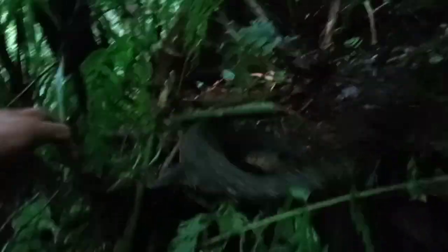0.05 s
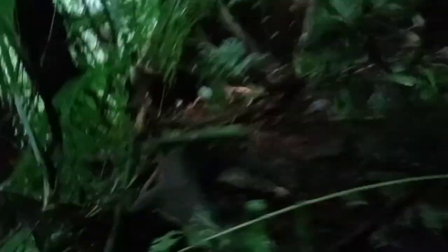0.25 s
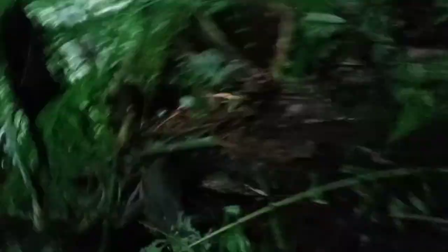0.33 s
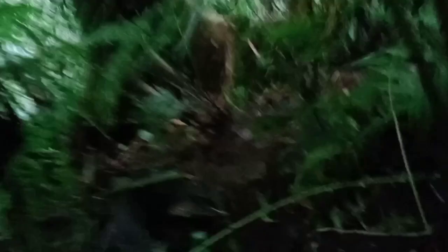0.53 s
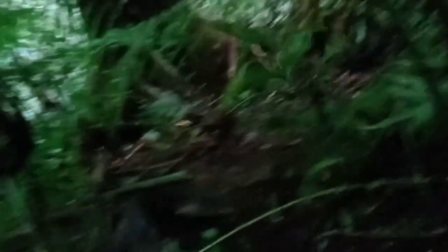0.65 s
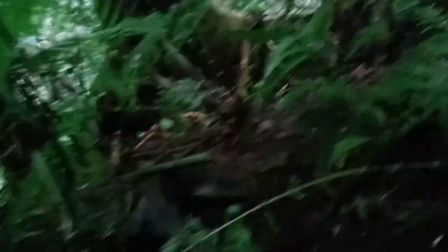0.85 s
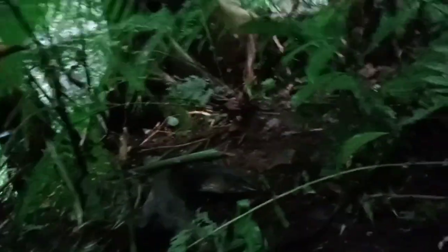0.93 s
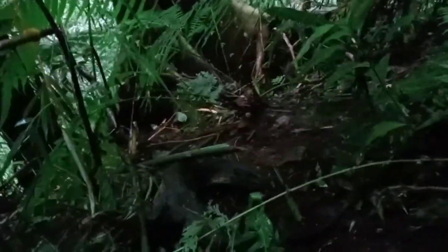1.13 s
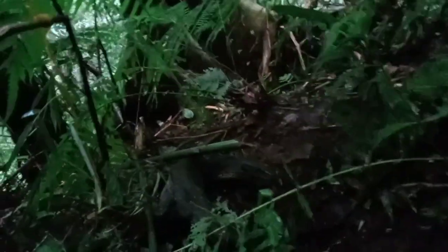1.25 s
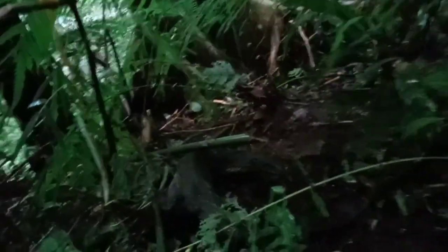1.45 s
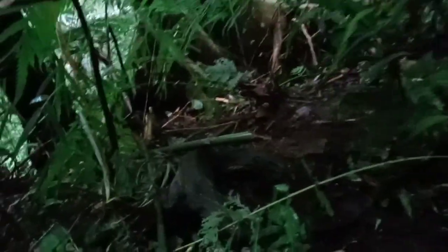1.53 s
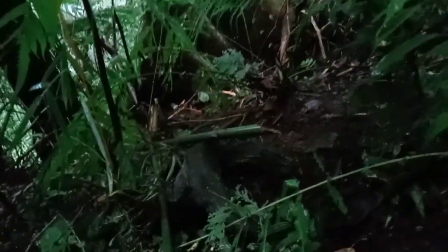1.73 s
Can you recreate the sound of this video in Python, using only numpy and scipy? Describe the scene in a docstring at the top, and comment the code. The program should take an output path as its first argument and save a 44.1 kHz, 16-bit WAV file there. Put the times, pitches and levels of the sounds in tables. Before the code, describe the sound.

One close chop in a damp forest: leaves brush, a blade cracks through a stalk, and torn foliage rustles and settles. A quiet, steady sound like flowing water continues underneath, with a few faint, far-off bird whistles afterwards.

```python
"""A blade chops once through a green stalk in a damp forest, close by.
A steady wash like running water is there from the start. Leaves brush and twigs snap during the swing.
At 0.2 s the blade swishes in and crushes the stalk, which cracks and rings with a dull thud.
Its fibres tear and the foliage rustles to rest. From 0.8 s a few faint, distant bird whistles follow,
with one soft bump near 1.5 s."""
import sys
import numpy as np
from scipy import signal
from scipy.io import wavfile
from scipy.ndimage import uniform_filter1d

SR = 44100
rng = np.random.default_rng(int(sys.argv[2]) if len(sys.argv) > 2 else 0)


def generate_wav(signal):
    """Clip the signal to [-1, 1] and save it as 16-bit WAV at the path in sys.argv[1]."""
    frames = np.transpose(np.atleast_2d(signal))
    scaled = np.clip(frames, -1, 1) * 32767
    pcm = np.round(scaled).astype(np.int16)
    wavfile.write(sys.argv[1], SR, pcm)


N = 79380
T = np.arange(N) / SR

# Tone of the stalk being crushed under the blade: frequency_hz, relative_db
STALK_SPECTRUM = [(30, -46), (75, -10), (160, -1), (400, -4.5), (700, -8), (860, -7), (1200, -14),
                  (1600, -12), (2200, -3.5), (3200, -4), (4050, -23), (4600, -10), (7900, -11),
                  (10300, -22.5), (15300, -22)]
# Tone of leaves rubbing together: frequency_hz, relative_db
LEAF_SPECTRUM = [(40, -24), (90, -5.5), (260, -6), (500, -10), (1050, -8.5), (1800, -13.5), (2500, -3.5),
                 (3300, -3.5), (4100, -12), (5500, -11.5), (7200, -6), (8500, -15.5), (10200, -20),
                 (12500, -16.5), (15200, -11)]


def amp(db):
    """Turns decibels into a number to multiply by."""
    return 10 ** (np.asarray(db) / 20)


def evened(x):
    """Scales a signal to an average (rms) level of 1."""
    return x / np.sqrt(np.mean(x ** 2) + 1e-20)


def level_at(spectrum, hz):
    """Reads a spectrum between its points, on a logarithmic frequency scale."""
    points_hz, points_db = np.transpose(spectrum)
    return np.interp(np.log(hz + 1), np.log(points_hz + 1), points_db)


def add(mix, start_s, sound):
    """Adds a sound to the mix at the given time."""
    part = mix[max(round(start_s * SR), 0):][:len(sound)]
    part += sound[:len(part)]


def colour(x, spectrum, size=4096):
    """Gives a sound the tone of a spectrum; white noise keeps its power."""
    log_gain = np.log(amp(level_at(spectrum, abs(np.fft.fftfreq(size, 1 / SR)))))
    response = np.exp(np.conj(signal.hilbert(log_gain)))  # rings after a click, never before
    taps = np.fft.ifft(response).real[:size // 2]
    return signal.fftconvolve(x, taps / np.linalg.norm(taps))[:len(x)]


def drift(count, smooth_over):
    """A smooth random wobble."""
    return evened(uniform_filter1d(rng.standard_normal(count), size=smooth_over))


def grains(per_s, spread_db):
    """A dense stream of tiny clicks of uneven size."""
    size = amp(spread_db * np.minimum(rng.exponential(1, N), 3))
    return evened(size * rng.choice([-1, 1], N) * (rng.random(N) < per_s / SR))


def forest_echo(x, fade_s):
    """Trunks and foliage scatter a sound into echoes that fall 60 dB in fade_s."""
    tail = rng.standard_normal(N) * amp(-60 * T / fade_s)
    return signal.fftconvolve(x, tail / np.linalg.norm(tail))[:N]


def water():
    """A far wash like running water: noise with drifting patches of tone and a slight swell."""
    # Tone of the wash: frequency_hz, relative_db
    wash_spectrum = [(20, -42), (35, -20), (51, -11), (75, -2.5), (140, -4), (230, -4), (300, -9.5),
                     (410, -5.5), (622, -8), (1230, -4.5), (2300, -2.5), (2900, -2.5), (3400, -4.5),
                     (4100, -14), (4550, -13), (4900, -9.5), (5500, -16.5), (6400, -22), (7800, -19),
                     (9900, -36.5), (12500, -40), (15500, -36.5)]
    # How its treble changes: time_s, boost_db
    treble_curve = [(0, 3), (0.5, 2), (1.05, 0.5), (1.45, 0.5), (1.8, -1.5)]
    frames, hz = N // 256 + 5, np.fft.rfftfreq(1024, 1 / SR)
    real, imaginary, patches = rng.standard_normal((frames, len(hz), 3)).T
    patches = uniform_filter1d(patches, size=7, axis=0)  # smooth across frequency
    patches_db = 1.77 * evened(uniform_filter1d(patches, size=4, axis=1))  # then across time
    swell_db = 0.2 * drift(frames, smooth_over=14)
    treble_db = np.interp(np.linspace(0, N / SR, frames), *np.transpose(treble_curve))
    level_db = level_at(wash_spectrum, hz)[:, None] + patches_db + swell_db
    level_db += np.outer(hz > 4140, treble_db)
    _, wash = signal.istft((real + 1j * imaginary) * amp(level_db), nperseg=1024, noverlap=768)
    return amp(-45) * evened(wash[:N])


def twig_snaps():
    """Thin stems snap with a brief, unsteady ring and a spray of splinters."""
    # Twigs and leaf stems breaking: start_s, level_db, pitch_hz, decay_s, splinter_db
    snaps = [(0.0125, -27, 3440, 0.0024, -18), (0.0480, -35, 3850, 0.0018, -24),
             (0.054, -24.5, 3530, 0.00092, -23), (0.1598, -20.5, 3620, 0.0018, -7),
             (0.1634, -23, 3520, 0.0014, -9), (0.1700, -20.5, 3540, 0.0013, -6),
             (0.181, -34, 3470, 0.00054, 7.5), (0.2274, -22.5, 3120, 0.00098, 7.5),
             (0.2394, -9, 3353, 0.0017, -11), (0.2551, -21.5, 3270, 0.00075, 8.5),
             (0.2744, -17.5, 3410, 0.0022, -5.5), (0.2838, -18, 2340, 0.0016, -18),
             (0.2897, -15.5, 3080, 0.0012, -1), (0.2924, -26.5, 3550, 0.00065, 8),
             (0.3208, -28.5, 3280, 0.0027, -4), (0.328, -23, 2810, 0.0022, -8),
             (0.4230, -28, 3350, .0012, -14), (0.433, -23, 3240, 0.0022, -11),
             (0.4336, -31, 866, 0.0034, -4), (0.4381, -26.5, 3740, 0.0018, 0.5),
             (0.4714, -30, 3150, 0.00086, -10), (0.4815, -34, 3150, .002, -14),
             (0.5164, -30.5, 3000, 0.0018, -9), (0.5975, -35, 2880, 0.0019, -10),
             (0.6115, -31, 2260, 0.0014, -9), (0.6263, -37, 2080, 0.0043, -15)]
    pitch_wobble, rise_s = 0.093, 0.00029
    out, t = np.zeros(N), T[:SR // 25]
    for start_s, level_db, pitch_hz, decay_s, splinter_db in snaps:
        unsteady_hz = pitch_hz * (1 + pitch_wobble * drift(len(t), smooth_over=16))
        ring = np.sin(2 * np.pi * np.cumsum(unsteady_hz) / SR)
        level = amp(level_db) * np.minimum(t / rise_s, 1) * np.exp(-t / decay_s)
        splinters = colour(level * rng.standard_normal(len(t)), LEAF_SPECTRUM)
        add(out, start_s, level * ring + amp(splinter_db) * splinters)
    return out


def rustles():
    """Leaves slide and fibres tear in strokes of tiny clicks, which make the leaves ring."""
    # Strokes: start_s, rise_s, hold_s, fall_db_per_s, level_db, treble_db, ring_hz, ring_db
    strokes = [(0.018, 0.029, .01, 500, -45.5, -1, 3760, 2), (0.128, .025, 0.015, 595, -43.5, 4, 3730, -5),
               (0.218, 0.027, 0.041, 900, -28, 0.5, 3310, -4),
               (0.287, 0.017, 0.024, 130, -37.5, -2.5, 3020, -3.5),
               (0.343, 0.02, 0.067, 153, -41.5, -3.5, 3460, -5),
               (0.564, 0.013, .055, 150, -54, -2, 3330, -0.5)]
    out = np.zeros(N)
    for start_s, rise_s, hold_s, fall_db_per_s, level_db, treble_db, ring_hz, ring_db in strokes:
        t = T - start_s
        fallen_db = fall_db_per_s * np.maximum(t - rise_s - hold_s, 0)
        level = np.clip(t / rise_s, 0, 1) * amp(level_db - fallen_db)
        spectrum = [(hz, db + treble_db * (hz > 8000)) for hz, db in LEAF_SPECTRUM]
        clicks = colour(grains(per_s=5000, spread_db=5), spectrum)
        leaf_filter = signal.iirpeak(ring_hz, Q=12, fs=SR)
        ring = evened(signal.lfilter(*leaf_filter, grains(per_s=5000, spread_db=5)))
        out += level * (clicks + amp(ring_db) * ring)
    return out


def blade_swish():
    """The blade sweeps through air and leaves, growing louder until it lands."""
    lands_s, peak_db, rise_db_per_s = 0.2097, -36, 602
    level = amp(peak_db - rise_db_per_s * abs(lands_s - T)) * (T < lands_s)
    return colour(level * rng.standard_normal(N), STALK_SPECTRUM)


def leaf_ticks():
    """Leaf edges flick past each other with fine, bright ticks."""
    # Flicks: start_s, level_db
    flicks = [(0.16, -39), (0.2112, -17), (0.2792, -27), (0.5857, -38), (0.5922, -54), (0.5975, -50)]
    # Their tone: frequency_hz, relative_db
    spectrum = [(100, -44), (5000, -35), (7500, 0), (10500, -12), (14000, 2), (15500, 0)]
    decay_s = 0.00071
    out, t = np.zeros(N), T[:SR // 50]
    for start_s, level_db in flicks:
        add(out, start_s, amp(level_db) * np.exp(-t / decay_s) * rng.standard_normal(len(t)))
    return colour(out, spectrum)


def fibre_crush():
    """The blade crushes wet fibres: a burst of clicks that dies quickly."""
    start_s, rise_s, peak_db, fall_db_per_s = 0.2040, 0.0015, -18, 249
    t = T - start_s
    rise = np.clip(t / rise_s, 0, 1) ** 0.5
    level = rise * amp(peak_db - fall_db_per_s * np.maximum(t - rise_s, 0))
    return colour(level * grains(per_s=6000, spread_db=4.5), STALK_SPECTRUM)


def stalk_thud():
    """Each blow makes the stalk ring with low tones that die almost at once; the chop's thud comes back as a
    faint echo."""
    # The stalk's tones at the first blow: pitch_hz, level_db, fade_s (time to fall 60 dB)
    tones = [(135.5, -17.5, 0.095), (194, -11, 0.039), (271, -14, 0.03), (334, -18, 0.024),
             (480, -18.5, 0.01), (631, -21, 0.043)]
    # The chop, its echo a moment later, the sagging stalk and later soft bumps: start_s, strength_db, #
    # pitch_ratio
    blows = [(0.2084, 0, 1), (0.2230, -10, 1), (0.2335, -15, .65), (0.2750, -22, 1), (1.528, -29, .95)]
    rise_s, low_cut_hz = 0.00085, 69
    out, t = np.zeros(N), T[:SR // 4]
    for start_s, strength_db, pitch_ratio in blows:
        ring = sum(amp(level_db - 60 * t / fade_s) * np.cos(2 * np.pi * pitch_hz * pitch_ratio * t)
                   for pitch_hz, level_db, fade_s in tones)
        add(out, start_s, amp(strength_db) * ring * (1 - np.exp(-t / rise_s)))
    return signal.sosfilt(signal.butter(1, low_cut_hz, "high", fs=SR, output="sos"), out)


def stalk_cracks():
    """Each break is one sharp push and pull of air with a short splintering tail."""
    # Breaks in the stalk: time_s, relative_db, width_ms, tail_db
    breaks = [(0.2093, -2.5, .105, -18), (0.2151, -17, .12, -12), (0.2179, -7, .05, -19),
              (0.2306, -16, .09, -9)]
    lead_s, tail_decay_s = 0.002, 0.002
    out = np.zeros(N)
    t = T[:SR // 20] - lead_s  # starts early to leave room for the push
    for time_s, relative_db, width_ms, tail_db in breaks:
        widths = t / (width_ms / 1000)
        pulse = -widths * np.exp((1 - widths ** 2) / 2)
        splinters = rng.standard_normal(len(t)) * (t > 0) * np.exp(-abs(t) / tail_decay_s)
        tail = amp(tail_db) * colour(splinters, STALK_SPECTRUM)
        add(out, time_s - lead_s, amp(relative_db) * (pulse + tail))
    return out


def birds():
    """Distant birds give falling, slightly warbling whistles, blurred by the trees."""
    # Whistles: start_s, length_s, start_hz, end_hz, relative_db
    whistles = [(0.786, 0.037, 3036, 2840, -49), (0.865, 0.061, 2980, 2780, -45),
                (1.328, .17, 3087, 2138, -48), (1.55, 0.15, 3266, 2950, -54)]
    out = np.zeros(N)
    for start_s, length_s, start_hz, end_hz, relative_db in whistles:
        progress = np.linspace(0, 1, int(length_s * SR))
        warble = 1 + 0.0248 * drift(N, smooth_over=200)[:len(progress)]
        pitch_hz = (start_hz + (end_hz - start_hz) * progress) * warble
        tone = np.sin(2 * np.pi * np.cumsum(pitch_hz) / SR)
        soft_ends = np.clip(10 * np.minimum(progress, 1 - progress), 0, 1)
        add(out, start_s, amp(relative_db) * evened(tone * soft_ends))
    return amp(-5.5) * out + amp(-3) * forest_echo(out, fade_s=0.22)


def scene():
    """Mixes the chop, the foliage and their faint forest echo with the water and birds."""
    chop = blade_swish() + amp(-0.5) * stalk_cracks() + fibre_crush()
    hollow = signal.iirnotch(863, Q=3.25, fs=SR)  # the stalk hollows out the tone near 863 Hz
    near = signal.lfilter(*hollow, chop) + rustles() + twig_snaps() + leaf_ticks()
    echo = amp(-17.5) * forest_echo(near, fade_s=0.65)
    return (near + stalk_thud() + echo + water() + birds())[None]


def record(dry):
    """Takes away the deepest rumble and the very highest treble."""
    low_cut_hz, high_cut_hz = 58.5, 15500
    rumble_filter = signal.butter(3, low_cut_hz, "high", fs=SR, output="sos")
    treble_filter = signal.firwin(1023, high_cut_hz, window=("kaiser", 9), fs=SR)
    return signal.oaconvolve(signal.sosfilt(rumble_filter, dry), treble_filter[None], "same")


dry = scene()
out = record(dry)
generate_wav(out)
```